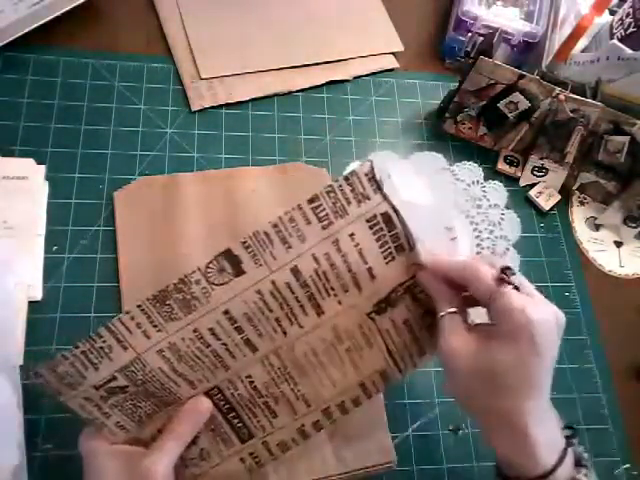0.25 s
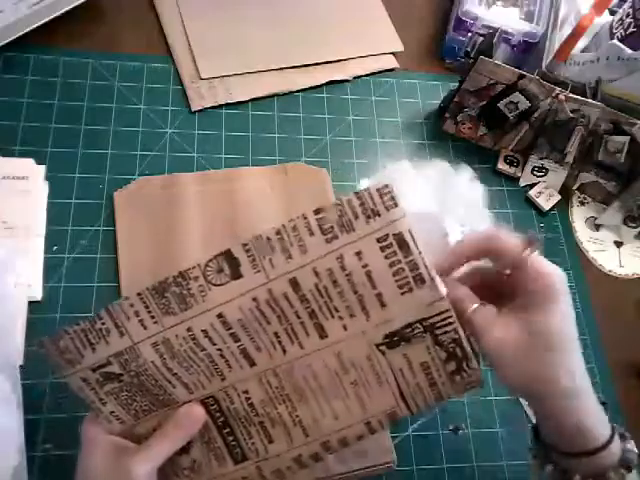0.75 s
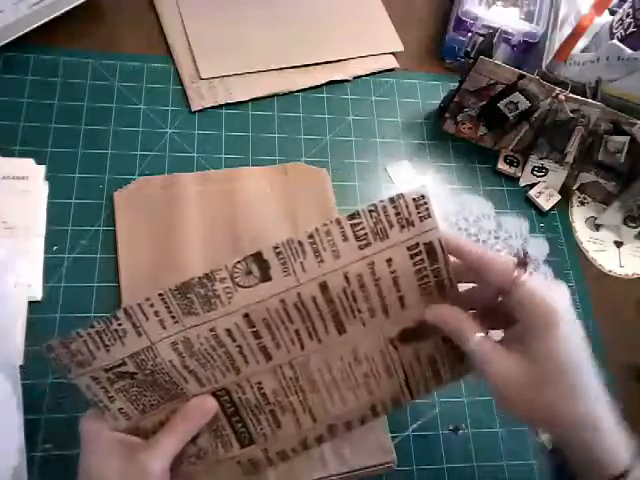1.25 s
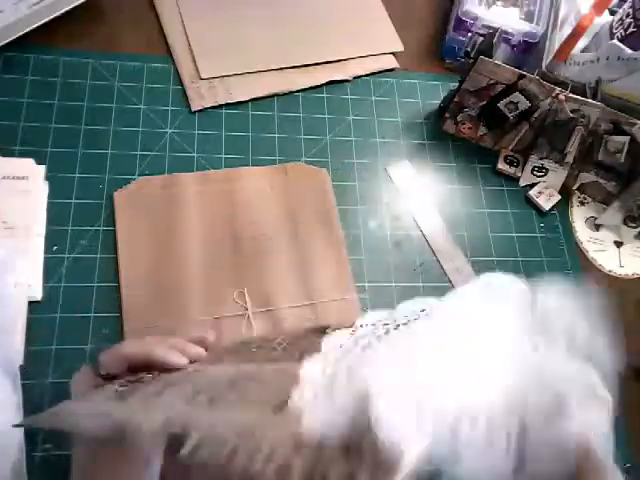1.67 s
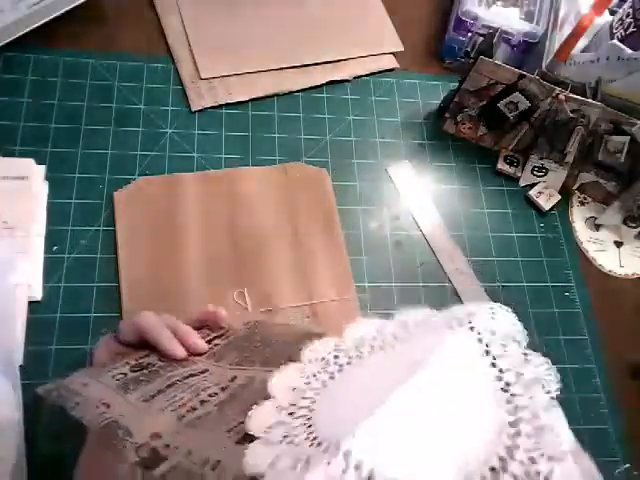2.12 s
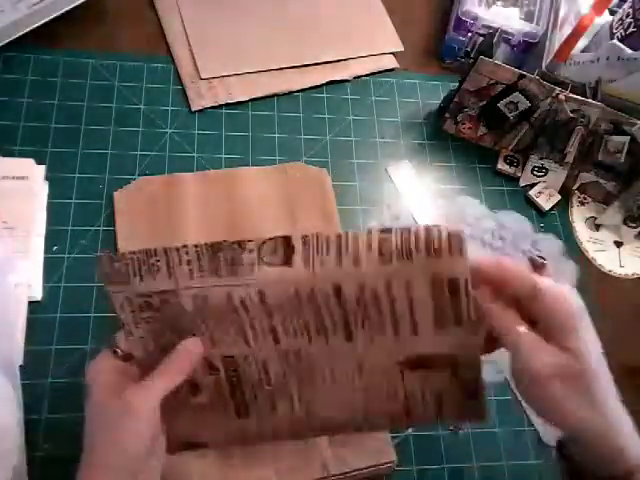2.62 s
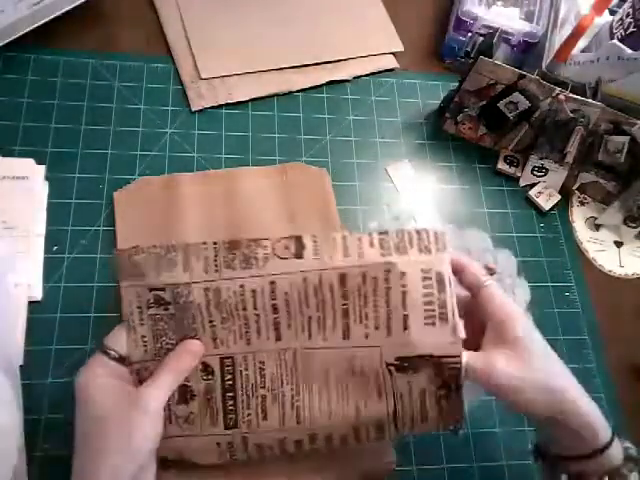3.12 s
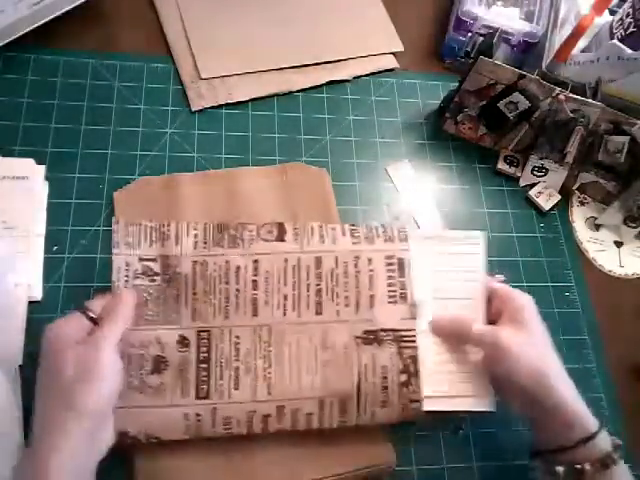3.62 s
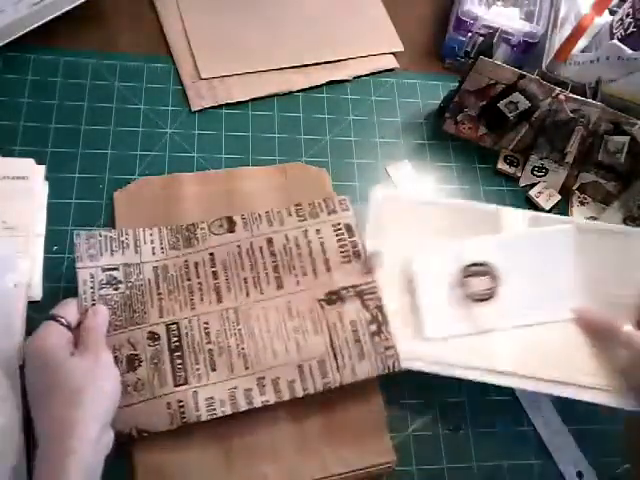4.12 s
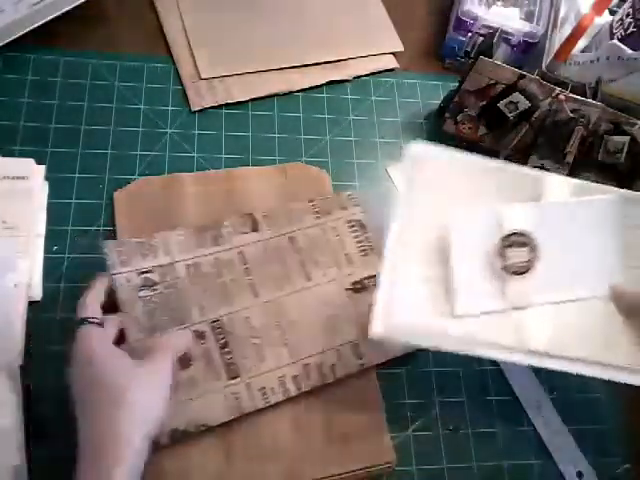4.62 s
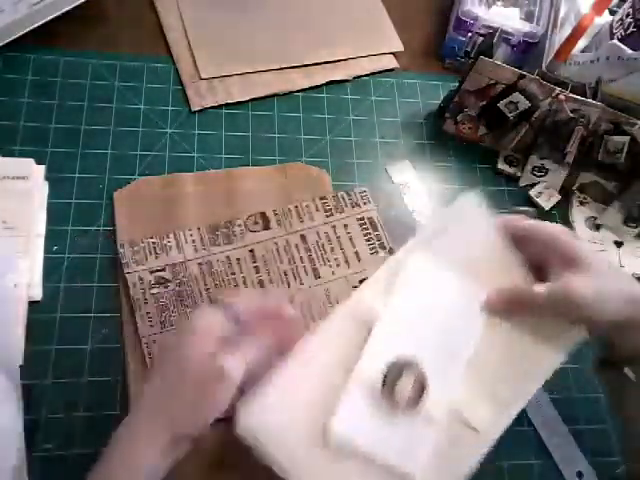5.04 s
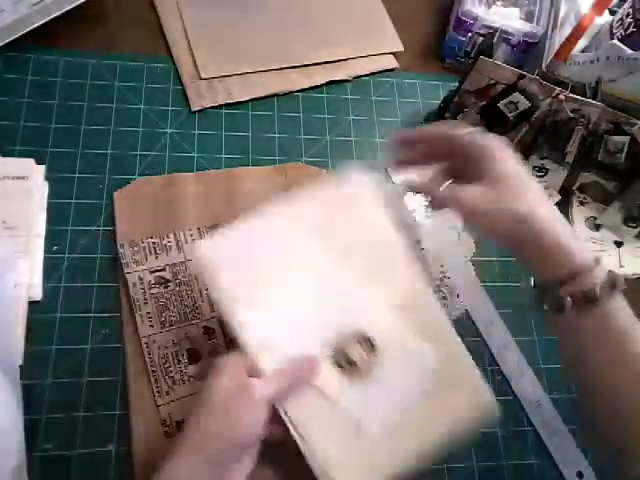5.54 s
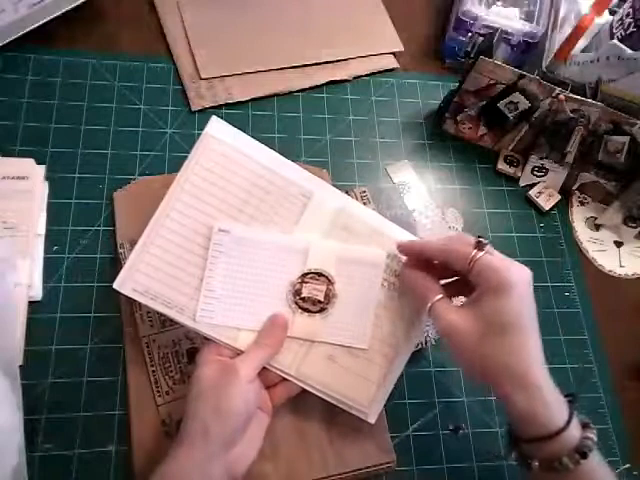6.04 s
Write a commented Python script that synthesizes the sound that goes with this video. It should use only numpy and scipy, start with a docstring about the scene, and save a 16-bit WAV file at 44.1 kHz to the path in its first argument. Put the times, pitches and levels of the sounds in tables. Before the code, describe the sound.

A thin paper bag crackles and snaps close up, sheets slide out with a dry rustle, then near quiet with faint paper touches.

```python
"""A thin paper bag is handled over a crafting table, close to a small microphone in a quiet room.
Its creases snap as ragged noise bursts that ring a panel; paper slides on paper as noise mixed with
tiny ringing grains, while a stack of sheets is drawn out. Fingers brush the paper early and late, as
high noise swells. Table and walls answer with echoes and a tail, over air noise and faint low tones."""
import sys
import numpy as np
from scipy import signal
from scipy.fft import rfft, irfft, next_fast_len
from scipy.io import wavfile
from scipy.ndimage import map_coordinates

SR = 44100
rng = np.random.default_rng(int(sys.argv[2]) if len(sys.argv) > 2 else 0)


def materialize(psi):
    """Save the field psi as 16-bit PCM at rate SR to the path in sys.argv[1].

    A 1-D psi becomes a single channel; in a 2-D psi each row is a channel.
    """
    bounded = np.clip(np.atleast_2d(psi).T, -1, 1)
    quanta = np.round(bounded * 32767).astype(np.int16)
    wavfile.write(sys.argv[1], SR, quanta)


N = 277168  # length [samples]


def amp(db):
    """Decibels to gain."""
    return 10 ** (np.asarray(db) / 20)


def unit(x):
    """Scale to rms 1."""
    return x / np.sqrt(np.mean(x ** 2) + 1e-20)


def along(points, hz):
    """(frequency [Hz], value) points read on a log frequency axis."""
    f, v = np.transpose(points)
    return np.interp(np.log(hz + 1), np.log(f + 1), v)


def wobble(rate):
    """A smooth random curve, rate knots a second."""
    knots = rng.standard_normal(int(N * rate / SR) + 4)
    return map_coordinates(knots, [np.arange(N) * rate / SR])


def filtered(x, response):
    """x times a response of frequency."""
    m = next_fast_len(N + SR // 2)
    return irfft(rfft(x, m) * response(np.fft.rfftfreq(m, 1 / SR)), m)[..., :N]


def coloured(x, spectrum, size=1024):
    """Minimum-phase filter with the given spectrum and unit energy, so that attacks stay sharp."""
    level = amp(along(spectrum, np.fft.rfftfreq(size, 1 / SR)))
    cepstrum = irfft(np.log(level + 1e-6))
    # folding the cepstrum forward in time makes the filter causal
    cepstrum[1:size // 2] *= 2
    cepstrum[size // 2 + 1:] = 0
    ring = irfft(np.exp(rfft(cepstrum)))
    return signal.fftconvolve(x, ring / np.linalg.norm(ring))[:len(x)]


def split(x, edge_hz):
    """The parts of x below and above an edge; they add up to a flat response."""
    parts = []
    for side in ("low", "high"):
        once = signal.butter(2, edge_hz, side, fs=SR, output="sos")
        parts.append(signal.sosfilt(np.tile(once, (2, 1)), x))
    return parts


def add(track, s, sound):
    """Mix a sound into the track at s seconds."""
    part = track[max(round(s * SR), 0):][:len(sound)]
    part += sound[:len(part)]


# colour of the air noise: (frequency [Hz], relative level [dB per Hz])
AIR_COLOUR = [(20, -42.5), (45, -11.5), (58, -17), (90, -9), (125, -6.5), (175, -7.5), (290, -11.5),
              (430, -12), (600, -18), (1160, -27.5), (3000, -35.5), (4000, -39.5), (9000, -47),
              (16000, -50.5)]
# steady low room tones: (frequency [Hz], level [dB rms])
ROOM_TONES = [(119, -71.5), (175, -70.5), (425, -75.5)]
AIR_DB = -58.8  # rms level before the lows swell


def room_tone():
    """Low air noise that swells a little, with faint low sines that waver in phase."""
    air = unit(filtered(rng.standard_normal(N), lambda hz: amp(along(AIR_COLOUR, hz))))
    t = np.arange(N) / SR
    tones = 0
    for hz, db in ROOM_TONES:
        tones = tones + amp(db) * np.sqrt(2) * np.sin(2 * np.pi * hz * t + 0.38 * wobble(rate=9))
    low, high = split(air, edge_hz=500)
    swell = amp(1.2 * wobble(rate=13))
    return amp(AIR_DB) * (low * swell + high) + tones


# echoes off near surfaces: (mean delay [ms], gain relative to the direct sound)
NEAR_SURFACES = [(1.1, 0.2), (3.7, 0.33), (7.6, 0.19), (10.6, 0.15), (12.2, 0.26)]
# decay of the diffuse tail: (frequency [Hz], time to fall 60 dB [s])
TAIL_DECAY = [(250, 0.68), (2000, 0.24), (7000, 0.23), (14000, 0.35)]


def answer(tail_db):
    """Table and near walls return quick copies, with a diffuse tail that decays by frequency."""
    hz, t, z = signal.stft(rng.standard_normal(SR // 3), SR, nperseg=256)
    decay = amp(-60 * t / along(TAIL_DECAY, hz)[:, None])
    tail = signal.istft(z * decay, SR, nperseg=256)[1]
    # the tail takes a few ms to build up
    tail = tail * (1 - np.exp(-np.arange(len(tail)) / SR / 0.0029))
    echo = amp(tail_db) * tail / np.linalg.norm(tail)
    echo[0] = 1  # direct sound
    for delay_ms, gain in NEAR_SURFACES:
        add(echo, (delay_ms + rng.uniform(-.5, .5)) / 1000, np.array([gain]))
    return echo / np.linalg.norm(echo)


def room(x, tail_db, size=4096):
    """The sounding spot wanders over the paper, so the echo paths keep changing."""
    out = np.zeros(N + size)
    window = signal.get_window("hann", size)
    x = np.pad(x, (size // 2, size))
    # overlapping blocks each get a fresh echo pattern
    for i in range(0, N + size // 2, size // 2):
        add(out, i / SR, signal.fftconvolve(x[i:i + size] * window, answer(tail_db)))
    return out[size // 2:][:N]


# fingertips brushing smooth paper: (time of peak [s], level [dB], gaussian half-length [s])
FINGER_BRUSHES = [(0.187, -35, 0.0099), (0.262, -40, .008), (.415, -40.5, 0.017), (5.42, -73, .05),
                  (5.472, -61, 0.02), (5.563, -68, .012), (6.03, -69, 0.022), (6.209, -54, 0.0083),
                  (6.24, -68, 0.029)]
# colour of the brushing: (frequency [Hz], relative level [dB per Hz])
BRUSH_COLOUR = [(1000, -34), (4500, -26.5), (6000, -8), (7300, -3.5), (8400, -6), (10000, -23),
                (16000, -36.5)]


def brushing():
    """Light strokes on smooth paper give only a thin, high whisper."""
    t = np.arange(N) / SR
    stroke = sum(amp(db) * np.exp(-((t - s) / half) ** 2 / 2) for s, db, half in FINGER_BRUSHES)
    flutter = amp(1.7 * wobble(rate=140))
    return stroke * flutter * unit(coloured(rng.standard_normal(N), BRUSH_COLOUR))


# strokes of paper sliding on paper: (time of full pressure [s], length [s], sheet body level [dB],
# hiss over body [dB], share of crackle [0-1])
SLIDE_STROKES = [(0.073, 0.022, -47.5, 2.5, .3), (0.154, 0.13, -54.5, 11, 0.45),
                 (0.416, 0.067, -53, 9.5, 0.1), (.585, .12, -50, 3, 0.2), (0.768, 0.034, -40, -2.5, 0.34),
                 (0.835, 0.14, -54, 3.5, 0.25), (1.079, 0.037, -49, 0, 0.32),
                 (1.186, 0.054, -53.5, 0.5, 0.4), (1.365, .02, -47, -1.5, 0),
                 (1.441, 0.13, -48.5, 1.5, 0.4), (1.6, .11, -46, 2.5, .35), (1.77, 0.035, -44.5, -2, .35),
                 (1.858, 0.041, -39.5, -0.5, 0.36), (1.994, 0.085, -41, -6.5, 0.4),
                 (2.148, 0.046, -43, -0.5, 0.3), (2.37, 0.019, -52, -2, .45), (2.469, 0.048, -39, 1, 0.3),
                 (2.633, 0.019, -39.5, -4, .45), (2.713, 0.2, -52, -2.5, 0.4),
                 (3.067, 0.039, -37.5, 3.5, 0.47), (3.194, 0.03, -35.5, 3.5, 0.58),
                 (3.337, 0.019, -41, 4, 0.6), (3.402, 0.14, -41.5, -5, .45), (3.539, .13, -39, 5, 0.16),
                 (3.72, .08, -47.5, 6.5, .15), (3.831, 0.036, -44.5, 6, .15), (3.93, 0.028, -43, 6, 0.3),
                 (3.992, 0.021, -41, 4.5, .2), (4.037, .14, -49.5, 9.5, .08),
                 (4.327, 0.036, -39.5, 1.5, 0.6), (4.418, 0.068, -47, -3, 0.64),
                 (4.623, 0.13, -58.5, 4, 0.27), (4.856, 0.27, -73, -7, .2), (5.327, .18, -67.5, -4.5, 0.27)]
# the bag stirs faintly while it is held, first loosely, then in a firmer grip:
# (start [s], length [s], sheet body level [dB], hiss over body [dB], share of crackle [0-1])
BAG_HOLD = [(0, 1.6, -58.5, -3, 0.37), (2.2, 2.3, -53.5, -4.5, 0.35)]
# every stroke: its swell, its loss as the hand slows, its fall
RISE_DB_PER_S, SAG_DB, RELEASE_DB_PER_S = 217.5, 3.5, 221.5


def pressure():
    """Strokes rise, sag and fall away, setting the body gain, hiss gain and share of crackle."""
    t = np.arange(N) / SR
    body = hiss = catching = 0
    for s, length, db, hiss_db, share in SLIDE_STROKES + BAG_HOLD:
        age = t - s
        rise_db = RISE_DB_PER_S * np.minimum(age, 0)
        sag_db = SAG_DB * np.clip(age / length, 0, 1)
        release_db = RELEASE_DB_PER_S * np.maximum(age - length, 0)
        power = amp(db + rise_db - (sag_db + release_db)) ** 2
        body = body + power
        hiss = hiss + power * amp(hiss_db) ** 2
        catching = catching + power * share
    return np.sqrt(body), np.sqrt(hiss), np.clip(catching / body, 0, .85)


def crackle(rate, centre_hz, spread, cycles, scatter_db, size=256):
    """Tiny facets of the paper flip at random, each ringing a few cycles at its own pitch."""
    count = int(rate * N / SR)
    start, loud, pitch = rng.random((count, 3)).T
    # spread is in octaves either side of the centre
    hz = np.minimum(centre_hz * 2 ** (spread * (2 * pitch - 1)), SR / 2)[:, None]
    # mostly weak flips, a few strong ones
    strength = amp(scatter_db * np.minimum(-np.log(1 - loud), 4))[:, None]
    turns = hz * np.arange(size) / SR
    grains = strength * hz / centre_hz * np.sin(2 * np.pi * turns) * np.exp(-turns / cycles)
    where = (start * N).astype(int)[:, None] + np.arange(size)
    return unit(np.bincount(where.ravel(), grains.ravel(), N)[:N])


# colour of the sliding rush: (frequency [Hz], relative level [dB per Hz])
SLIDE_COLOUR = [(100, -19.5), (175, -3.5), (260, -10), (370, -6), (425, 1.5), (510, -5), (900, -3.5),
                (1450, -3.5), (2500, -6), (4500, -6), (6000, -6), (7400, -0.5), (8400, -7), (10500, -19),
                (13000, -28), (16000, -35.5)]
# colour of creasing paper, shared by these ticks and the snaps below:
# (frequency [Hz], relative level [dB per Hz])
CREASE_COLOUR = [(100, -36.5), (250, -17.5), (800, -10), (1150, -7.5), (1500, -5.5), (2700, -5), (3300, -6),
                 (5500, -5), (7400, 2), (8400, -6), (11000, -22), (16000, -36)]


def sliding(body_gain, hiss_gain, share):
    """Fibres catch and slip: an airy rush with crackle in it, uneven as the pressure changes."""
    rush = coloured(rng.standard_normal(N), SLIDE_COLOUR)
    facets = crackle(rate=300, centre_hz=4450, spread=1.42, cycles=1.6, scatter_db=3.5)
    ticks = coloured(facets, CREASE_COLOUR)
    rustle = np.sqrt(1 - share) * unit(rush) + np.sqrt(share) * unit(ticks)
    body, hiss = split(rustle, edge_hz=3510)
    # larger facets ring lower and longer
    flicks = crackle(rate=90, centre_hz=1963, spread=0.96, cycles=3, scatter_db=3.0)
    body = unit(unit(body) + 0.69 * np.sqrt(share) * flicks)
    # a catching sheet moves in jerks, a gliding one evenly
    grip_db = (1 + 2.9 * share) * wobble(rate=80)
    return amp(grip_db) * (body * body_gain + unit(hiss) * hiss_gain)


def snap(length_ms, panel_db, panel_hz, sharpness, ragged_db, size=2048):
    """A crease gives way in a quick run of tiny slips and rings the panel beside it."""
    u = np.arange(size) / SR * 1000 / np.clip(length_ms, .4, 15)  # time in snap lengths
    slips = rng.standard_normal(size) * amp(ragged_db * rng.standard_normal(size))
    # the run builds up, spends itself, and the panel settles
    run = (1 - np.exp(-u / 0.041)) * (np.exp(-u ** 4) + .15 * np.exp(-u / 6.7))
    # the crack itself has no pitch: keeping only the phase spreads its energy evenly over frequency
    flat = irfft(np.exp(1j * np.angle(rfft(slips * run))))
    sound = coloured(flat * np.sqrt(run), CREASE_COLOUR)
    panel = signal.lfilter(*signal.iirpeak(panel_hz, sharpness, fs=SR), sound)
    sound = sound + amp(panel_db) * panel
    # energy as if at rms 1 for one snap length
    return sound * np.sqrt(np.sum(u < 1) / np.sum(sound ** 2))


# small creases under any stroke: how often, their top level over the sheet body before the share of
# crackle scales it, and the random drop below that
CRINKLES_PER_S, CRINKLE_DB, CRINKLE_RANGE_DB = 20, 6.5, 3
# a typical one: length, panel pitch, panel resonance
CRINKLE_MS, CRINKLE_HZ, CRINKLE_PANEL_DB = 4.5, 1700, 13.5


def crinkles(body_gain, share):
    """Small creases pop at random, louder where the sheet is pushed hard and catches."""
    track = np.zeros(N)
    count = int(CRINKLES_PER_S * N / SR)
    for when, weak, length, pitch in rng.random((count, 4)):
        at = int(when * N)
        level = amp(CRINKLE_DB - CRINKLE_RANGE_DB * weak)
        gain = body_gain[at] * np.sqrt(2 * share[at]) * level
        length_ms = CRINKLE_MS * 2 ** (2 * length - 1)
        panel_hz = CRINKLE_HZ * 2 ** (1.4 * (pitch - .5))
        pop = snap(length_ms, CRINKLE_PANEL_DB, panel_hz, sharpness=5.0, ragged_db=1.5)
        add(track, at / SR, gain * pop)
    return track


# creases that buckle, from sharp snaps to short crumples: (time [s], level before the common lift
# [dB rms], length [ms], panel pitch [Hz], panel resonance [dB])
CREASE_SNAPS = [(.208, -39.5, 2.2, 1300, 15), (.227, -32, 0.45, 2200, -12), (.291, -33.5, 1.8, 3400, 4),
                (.314, -35.5, 1.3, 1700, -17), (.363, -44, 3, 1280, 25), (.428, -32, 4.8, 4600, 0),
                (.461, -21.5, 0.76, 4500, 7), (.577, -38, 5.2, 1270, 4), (.628, -35, 3.5, 1100, 2),
                (.793, -26, 3.7, 1600, 7), (0.9, -42.5, 3.4, 2140, 21), (1.029, -43.5, 3.8, 1200, 25),
                (1.3171, -24, 2.9, 2330, -15), (1.345, -39.5, 12, 2180, 7), (1.48, -36, 3.4, 1100, 7),
                (1.576, -29.5, 3.3, 1300, -3), (1.597, -21.5, 3, 3900, 1), (1.68, -30, 2.1, 4600, -14),
                (1.716, -27.5, 3.3, 1180, 1), (1.829, -29.5, 10, 2400, 1.5), (1.919, -22.5, 0.72, 2560, -5),
                (1.962, -34.5, 3, 1200, 23), (1.995, -32.5, 1.6, 1200, 1.5), (2.023, -30.5, 3.8, 1700, 2),
                (2.066, -32.5, 6.7, 1200, 13), (2.155, -15.5, 1.6, 4650, -3.5),
                (2.229, -33.5, 2.5, 1600, -3), (2.351, -38.5, 3.4, 1090, 17), (2.417, -32.5, 2.3, 1110, 4),
                (2.427, -35, 3, 4100, -6), (2.628, -33, 9.9, 1600, 7), (2.708, -31, 1.6, 1940, 11),
                (2.756, -29.5, 1.25, 1600, 4), (2.807, -38.5, 1.8, 4000, 0), (2.857, -36, 1.4, 1300, 6),
                (2.954, -36.5, 3.3, 1100, 11), (3.08, -24, 3, 3400, -8), (3.126, -25.5, 4.9, 2570, -1),
                (3.1434, -20.5, 3.1, 2510, -0.5), (3.177, -22.5, 13, 1600, 0.5),
                (3.184, -16.5, 3.7, 1400, -1.5), (3.219, -29, 8.9, 2110, 1), (3.2907, -14, 1.75, 4240, -2),
                (3.2922, -15, 2.3, 4200, -0.5), (3.4, -32, 6.8, 1540, 4), (3.515, -28.5, 2.3, 1860, 18.5),
                (3.533, -26.5, 3.2, 3700, 1), (3.659, -29.5, 2.8, 1400, -8), (3.984, -31.5, 5.7, 1850, 9),
                (4.149, -26, 5.8, 1190, 3.5), (4.325, -31, 4.3, 2430, 0), (4.343, -30, 6.5, 1370, 5),
                (4.377, -28.5, 3, 2720, 19.5), (4.455, -37, 7.5, 2040, 12), (4.505, -21.5, 1.65, 2070, 7),
                (4.56, -39.5, 2.4, 2370, 14), (4.605, -36, 1.6, 1800, -3), (5.475, -57, 7.5, 1400, 10),
                (6.117, -49, 2.6, 1100, 7), (6.193, -49.5, 9, 1100, 5)]
SNAP_LIFT_DB = 1.5  # common to all snaps


def creases():
    """The distinct snaps of the bag and of the sheets, each ringing its own panel."""
    track = np.zeros(N)
    for s, db, length_ms, panel_hz, panel_db in CREASE_SNAPS:
        sound = snap(length_ms, panel_db, panel_hz, sharpness=4.5, ragged_db=2)
        add(track, s, amp(db + SNAP_LIFT_DB) * sound)
    return track


def scene():
    """Paper in the room, over the room's own noise."""
    body_gain, hiss_gain, share = pressure()
    paper = creases() + sliding(body_gain, hiss_gain, share)
    paper = paper + brushing() + crinkles(body_gain, share)
    return (room(paper, tail_db=-6.5) + room_tone())[None]


TOP_HZ = 16000  # band limit of the recorder


def record(dry):
    """The small microphone drops the deepest bass; the recorder keeps nothing above its band limit."""
    return filtered(dry, lambda hz: (1 - np.exp(-(hz / 33) ** 4)) * (hz < TOP_HZ))


dry = scene()
out = record(dry)
materialize(out)
```